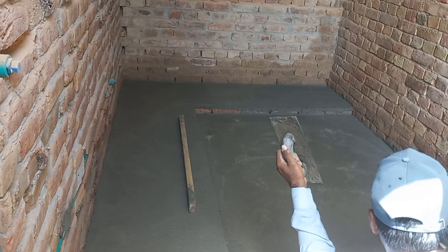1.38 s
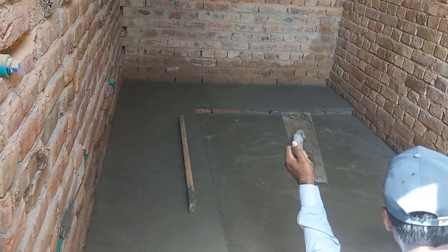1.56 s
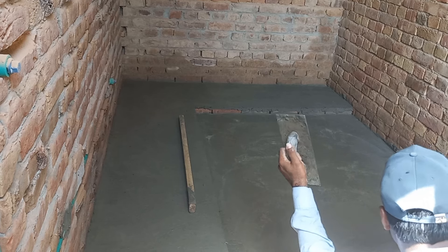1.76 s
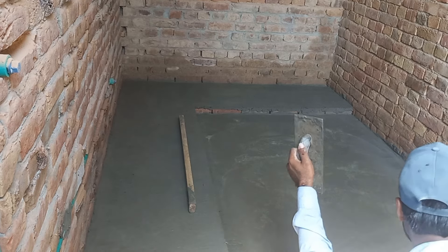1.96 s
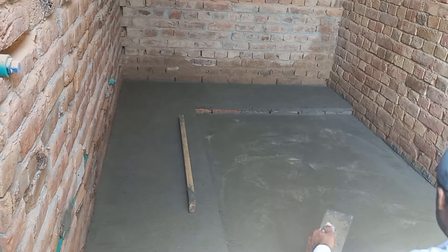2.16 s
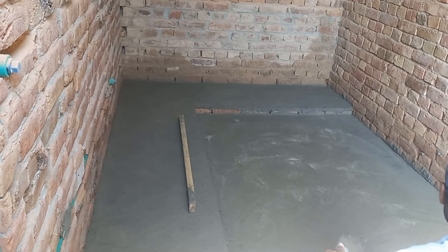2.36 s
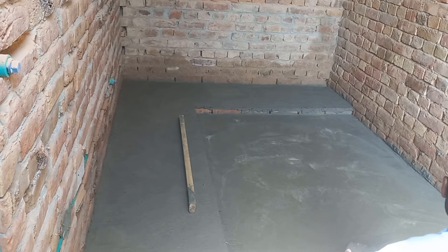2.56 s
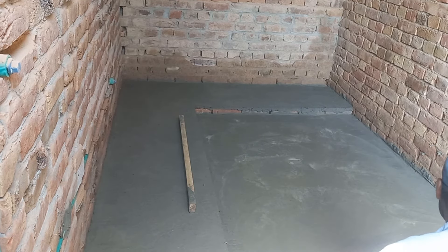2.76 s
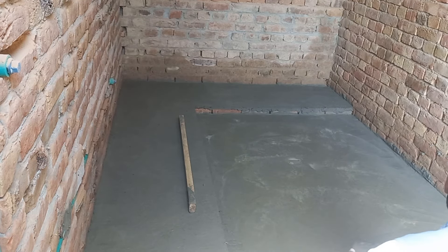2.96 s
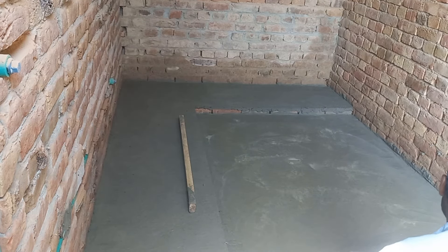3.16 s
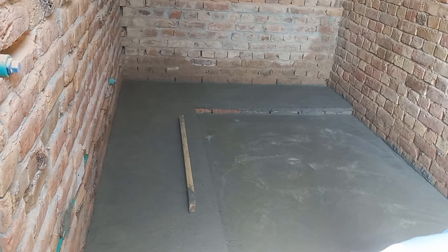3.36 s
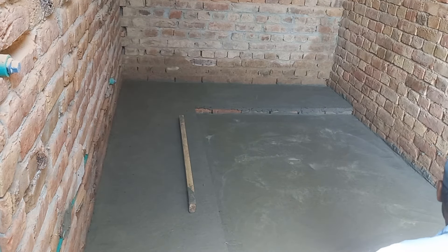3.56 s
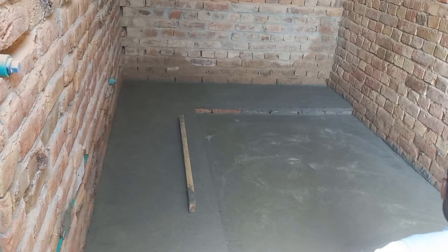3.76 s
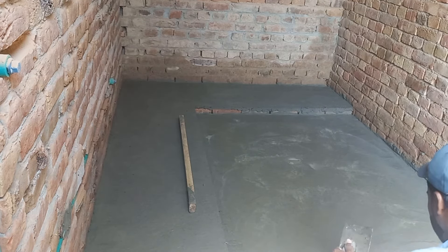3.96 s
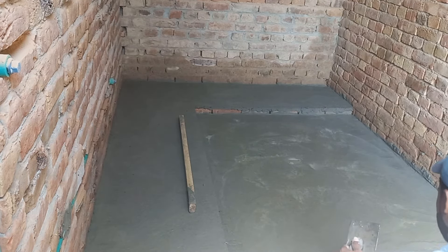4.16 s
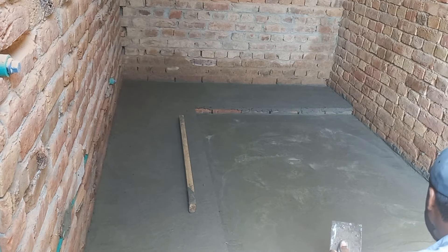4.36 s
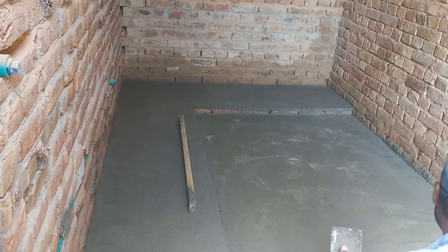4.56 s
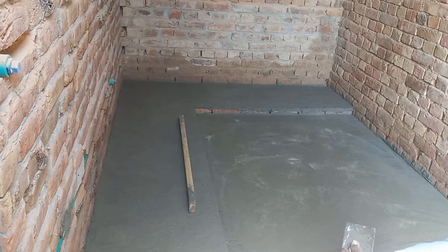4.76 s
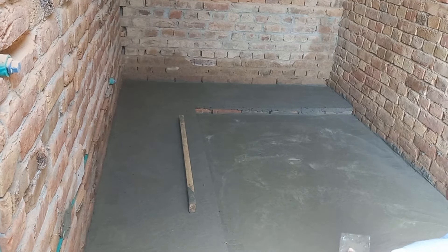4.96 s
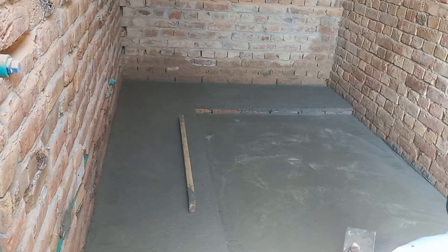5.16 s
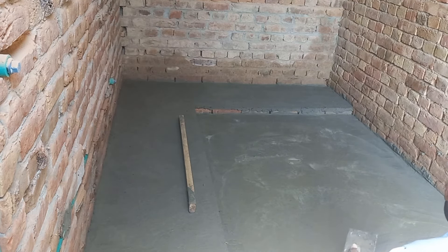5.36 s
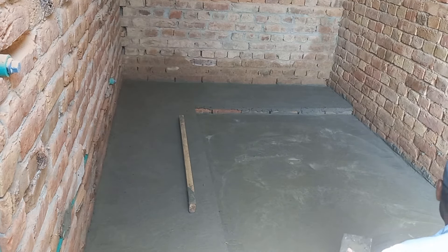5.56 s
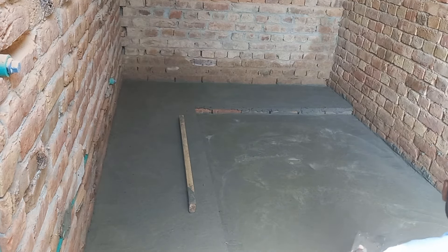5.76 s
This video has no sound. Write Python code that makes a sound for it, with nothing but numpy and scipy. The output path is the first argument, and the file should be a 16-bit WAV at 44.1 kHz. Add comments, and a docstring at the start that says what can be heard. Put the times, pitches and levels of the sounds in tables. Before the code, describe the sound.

Rapid, hissing trowel scrapes on wet cement in a small room, with soft thuds and a single loud wooden knock.

```python
"""A steel trowel smooths wet cement in a bare brick room, heard in fast motion: short slices of the work are
faded into each other. Sand hisses under the blade, and the steel sings faintly and pings on stones. The slab
drones as it is scraped, now louder, now quieter, and thuds stir the low notes of the room. One wooden knock
rings out. Two spaced microphones hear it all."""
import sys
import numpy as np
from scipy import signal
from scipy.fft import irfft
from scipy.io import wavfile
from scipy.ndimage import uniform_filter1d

SR = 44100
rng = np.random.default_rng(int(sys.argv[2]) if len(sys.argv) > 2 else 0)


def persist_wave(psi):
    """Save psi, clipped to +-1, as 16-bit WAV."""
    counts = np.round(np.clip(psi, -1, 1) * 32767).astype(np.int16)
    wavfile.write(sys.argv[1], SR, np.atleast_2d(counts).T)


N = 256662
SLICE_S, FIRST_CUT_S, FADE_S = .042007, .035, .01  # neighbouring slices overlap by one fade
FFT_SIZE = 4096
HZ = np.fft.rfftfreq(FFT_SIZE, 1 / SR)

# Moments when the trowel's sound sets in sharply: the lifted blade meets the cement, or the scraping hushes
# just before the knock. Each row: time in seconds, level change before that time in dB.
SHARP_ONSETS = [(0.797, -13.5), (1.857, -21), (3.399, -7), (3.514, -19)]
def trowel(start, length, hiss_db, bright_db, steel_db, steel_hz, drone_db, drone_hz, thud_db, swell_db):
    """One slice of a stroke: sand and steel swell or fade together, and the slab partly follows."""
    swell = gain_of(np.linspace(-.5, .5, length) * swell_db)
    swell /= np.sqrt(np.mean(swell ** 2))
    t = start - FADE_S / 2 + np.arange(length) / SR
    for land_s, quiet_db in SHARP_ONSETS:
        if t[0] < land_s < t[-1] - FADE_S / 2:
            swell[t < land_s] *= gain_of(quiet_db)
    scrape = sand(hiss_db, bright_db, length) + steel(steel_db, steel_hz, length)
    return scrape * swell + slab(drone_db, drone_hz, length) * swell ** 0.59 + thud(thud_db, length)


# The blade scrapes. Each row: start in seconds, hiss level in dB, swell across the slice in dB.
SCRAPES = [(0, -75, -3), (.035, -59, 5), (.077, -72.5, 8), (.119, -77.5, 1), (.161, -53.5, -11),
           (.203, -67.5, -1), (.245, -73, 0), (.287, -61.5, -12), (.329, -68.5, 2), (.37, -59, 4),
           (.412, -57.5, 2), (.455, -56.5, -1), (.497, -56, 1), (.538, -52.5, -3), (.581, -54.5, -1),
           (.623, -54, -2), (.665, -60.5, -5), (.707, -60.5, -2), (.749, -59, 1), (.793, -45, 1),
           (.833, -38, -3), (.874, -56.5, -28), (1.044, -47.5, 3), (1.085, -61.5, -15), (1.127, -52.5, -5),
           (1.211, -49, -3), (1.253, -53.5, -19), (1.337, -45.5, -12), (1.379, -51, -6), (1.42, -39, 10),
           (1.463, -42.5, -3), (1.504, -57, -10), (1.548, -55, 29), (1.589, -46.5, 3), (1.631, -52.5, 4),
           (1.715, -40, -4.5), (1.757, -52, -8), (1.798, -53.5, -17), (1.841, -52.5, 18), (1.883, -55, -9),
           (1.925, -61, 19), (1.967, -39.5, 0), (2.009, -49, -5), (2.05, -43.5, -6), (2.093, -40.5, -6),
           (2.135, -45, -15), (2.177, -46, -2), (2.219, -37.5, 4), (2.26, -58, 5), (2.302, -45, -4),
           (2.345, -45.5, -1), (2.387, -42, -4), (2.43, -41.5, 3), (2.47, -61, -17), (2.513, -37, 0),
           (2.555, -43, -7), (2.597, -44.5, -1), (2.639, -39, 9), (2.681, -34, -1), (2.724, -40, 2),
           (2.765, -40, -2), (2.807, -52, -6), (2.849, -51.5, -14), (2.891, -38.5, -6), (2.933, -41, -8),
           (2.975, -36.5, -1), (3.018, -48, 3), (3.059, -39, -1), (3.101, -45.5, -7), (3.143, -52, 3),
           (3.184, -46.5, -7), (3.227, -36, -7), (3.269, -38.5, 3), (3.311, -44, -8), (3.352, -63.5, -4),
           (3.395, -28.5, -4), (3.436, -49, -12), (3.479, -48, 14), (3.521, -39.5, 3), (3.563, -47.5, -13),
           (3.605, -43, -12), (3.647, -40.5, 11), (3.689, -39.5, -6), (3.731, -40.5, -1), (3.772, -48.5, 8),
           (3.814, -40, 0), (3.857, -53, -6), (3.899, -53, -18), (3.941, -41.5, 6), (3.982, -49.5, 1),
           (4.025, -44, -5), (4.109, -85, 0), (4.152, -56, 4), (4.192, -43.5, -1), (4.235, -54, 13),
           (4.277, -52.5, 0), (4.319, -58, 28), (4.361, -60, -5), (4.403, -49.5, 20), (4.445, -41, -5),
           (4.486, -52.5, 1), (4.529, -44, -4), (4.571, -70, -4), (4.613, -44.5, 0), (4.655, -47.5, -9),
           (4.697, -57, -1), (4.738, -44.5, 1), (4.781, -39.5, 3), (4.823, -53, 7), (4.865, -46, -7),
           (4.907, -51, -14), (4.949, -49, 5), (4.991, -49.5, 11), (5.033, -45.5, 3), (5.075, -53, -3),
           (5.117, -50, 1), (5.158, -50, -7), (5.202, -45, 2), (5.243, -43, -4), (5.285, -41, -12),
           (5.326, -50, 2), (5.368, -40, -15), (5.411, -46, 3), (5.453, -43.5, -12), (5.495, -41, -10),
           (5.537, -50, 6), (5.579, -54, -7), (5.62, -47, -1), (5.663, -54, 19), (5.705, -56.5, 2),
           (5.747, -58, -18), (5.79, -46, 4)]
def scrapes(count):
    """Hiss level and swell of every slice; a lifted blade leaves only a faint, even hiss."""
    hiss_db, swell_db = np.full(count, -79.0), np.zeros(count)
    for start, *row in SCRAPES:
        i = slice_at(start)
        hiss_db[i], swell_db[i] = row
    return hiss_db, swell_db


# The colour of the hiss. Each row: frequency in Hz, level in dB.
SAND_COLOUR = [(1470, -23), (2500, -3), (3600, 0), (3890, -2.5), (4550, 0), (7130, -8), (11800, -7.5),
               (14400, -11), (16000, -19.5)]
def sand(db, bright_db, length):
    """Sand grinds under the steel; bright_db tips the hiss towards the treble, in dB per octave."""
    tilt = gain_of(bright_db * np.log2((HZ + 1) / 7000))
    return noise(band(SAND_COLOUR) * tilt, db, length, rough_db=0.9, lump_samples=30)


# The colour of the singing blade. Each row: frequency in Hz, level in dB.
STEEL_COLOUR = [(700, -2), (1100, 3), (1600, 2), (2300, -0.5), (3100, -7), (4200, -7)]
def steel(db, hz, length):
    """The blade sings: a band of noise with one ringing pitch standing out."""
    ring = 1 + gain_of(-0.5) * resonance(hz, 190)
    return noise(band(STEEL_COLOUR) * ring, db, length, rough_db=0.48, lump_samples=80)


# Slices whose colour differs from the rest, among them the slices under the knock. Each row: start in seconds,
# hiss brightness in dB per # octave, steel level in dB, steel pitch in Hz.
COLOURED_SLICES = [(.035, -1.5, -61, 2530), (.161, 1, -54, 1650), (.538, -1.5, -53, 1360), (.793, 2, -31, 1420),
                   (.833, -1.5, -31.5, 1450), (.874, -2, -53.5, 1420), (1.044, 5.5, -51.5, 1230),
                   (1.253, 4.5, -57.5, 2000), (1.42, 0.5, -46, 1210), (1.463, 5, -48, 1310),
                   (1.631, 5, -58, 2740), (1.841, 4, -46.5, 2030), (1.925, -1, -62, 1830),
                   (2.26, 2.5, -73, 1390), (2.387, 6.5, -47.5, 1250), (2.43, 4, -54.5, 2850),
                   (2.47, -3, -63, 1850), (2.513, 2.5, -43, 3160), (2.555, 0, -54, 2660),
                   (2.891, 3, -52.5, 1800), (3.018, -2.5, -51.5, 1250), (3.143, 0, -50.5, 1250),
                   (3.227, -0.5, -43, 2270), (3.395, -1, -39.5, 2580), (3.436, -1, -60, 2920),
                   (3.479, -3, -53, 1480), (3.521, 1.5, -43, 2630), (3.563, -1, -54.5, 1260),
                   (3.647, 4, -56, 2170), (4.152, 1.5, -70, 2090), (4.403, 4, -76, 1250), (4.697, 1, -74, 1380),
                   (4.781, -1.5, -46.5, 2280), (4.949, 4.5, -54.5, 1360), (5.158, -4, -47, 1280),
                   (5.285, 1.5, -58, 2590), (5.663, 1.5, -73, 1260), (5.747, -1, -70, 1360),
                   (5.79, 3, -63, 2800)]
def blade_colours(rubbed_db, drone_db, pitch_chance, bright_chance):
    """The steel sings high when rubbed, lower when the slab shakes it; some slices set their own colour."""
    shaken_db = drone_db - 10
    steel_db = add_levels(rubbed_db, shaken_db)
    steel_hz = np.where(rubbed_db > shaken_db, 2650, 1340) * 2 ** (0.11 * pitch_chance)
    bright_db = 2.33 + 0.4 * bright_chance
    for start, *row in COLOURED_SLICES:
        i = slice_at(start)
        bright_db[i], steel_db[i], steel_hz[i] = row
    return bright_db, steel_db, steel_hz


# The blade hits stones. Each row: start in seconds, pitch in Hz, level in dB, rise in seconds,
# seconds to fade by 60 dB.
STONE_PINGS = [(1.564, 1500, -55, .002, 0.098), (1.667, 1940, -44, .001, 0.02),
               (1.858, 2080, -37, 0.00084, 0.024), (1.866, 2170, -34, 0.00085, 0.022),
               (3.515, 1390, -32.5, 0.00088, 0.027), (4.462, 2470, -38, .006, 0.067),
               (5.63, 2364, -48.5, 0.0037, 0.1)]
def pings(mix):
    """Each stone makes the steel ring briefly."""
    for start, hz, db, rise_s, ring_s in STONE_PINGS:
        t = np.arange(round(ring_s * SR)) / SR
        envelope = np.clip(t / rise_s, 0, 1) * gain_of(-60 * np.maximum(t - rise_s, 0) / ring_s)
        place(mix, start, tone(hz, db - 0.5, len(t), waver_db=2.2) * envelope)


# The steady work. Each row: time in seconds, drone under a medium scrape in dB, thud compared with the drone in
# dB, rubbed steel compared with the hiss in dB.
STEADY_WORK = [(0, -50, -4.5, -19), (.35, -46.5, -11, -4), (.64, -43, -10.5, -3), (.7, -49, -13, 1.5),
               (1, -51.5, -10, -3), (2, -51.5, -8, -7), (3, -50.5, -8, -9), (3.7, -53, -6, -11.5),
               (4.4, -54, -6.5, -8.5), (5, -52, -4.5, -8.5), (5.8, -56.5, 0, -10.5)]
def rubbing_levels(starts, hiss_db):
    """A louder scrape also drives the steel, the drone and the thud harder."""
    times, *columns = np.transpose(STEADY_WORK)
    drone_db, thud_offset_db, steel_offset_db = (np.interp(starts, times, column) for column in columns)
    medium_hiss_db = -46.5
    drone_db += 0.54 * (hiss_db - medium_hiss_db)
    return hiss_db + steel_offset_db, drone_db, drone_db + thud_offset_db


# The colour of the slab's drone. Each row: frequency in Hz, level in dB.
SLAB_COLOUR = [(130, -26), (220, -4), (420, -4), (570, -1.5), (800, -5.5), (1200, -11.5), (2200, -36)]
def slab(db, hz, length):
    """The slab drones: low noise plus one wavering note."""
    drone = noise(band(SLAB_COLOUR), db, length, rough_db=0.83, lump_samples=200)
    return drone + tone(hz, db - 6, length, waver_db=5.6)


# Slices where the slab's drone and thud take levels of their own, louder or quieter than usual. Each row: start
# in seconds, drone in dB, drone pitch in Hz, thud in dB.
SLAB_OWN_LEVELS = [(.161, -48, 247, -48), (.287, -50, 235, -53), (.497, -48, 320, -54.5), (.793, -33, 545, -63),
                   (.833, -32, 537, -39), (.874, -50.5, 310, -60), (1.085, -49, 592, -61), (1.42, -52, 776, -73),
                   (1.463, -44, 638, -59), (1.589, -41.5, 629, -56), (1.631, -52, 300, -56),
                   (1.674, -68, 476, -59), (1.715, -44.5, 507, -55), (1.757, -46, 340, -49.5),
                   (1.883, -50, 237, -58), (1.967, -45, 317, -60), (2.009, -47.5, 538, -55),
                   (2.219, -43, 646, -56), (2.302, -45, 634, -58), (2.345, -46.5, 544, -58),
                   (2.387, -37, 494, -48), (2.43, -52.5, 667, -48.5), (2.513, -37.5, 551, -60),
                   (2.555, -42.5, 636, -44.5), (2.597, -34, 282, -38.5), (2.639, -44, 592, -44),
                   (2.681, -38.5, 659, -36), (2.724, -47, 251, -48.5), (2.765, -54, 226, -45.5),
                   (2.849, -38.5, 483, -40.5), (2.975, -41, 573, -57), (3.018, -45, 589, -45.5),
                   (3.143, -44, 482, -48.5), (3.184, -44.5, 719, -54), (3.269, -39, 524, -57),
                   (3.311, -47.5, 673, -51), (3.352, -48, 584, -46.5), (3.395, -48, 469, -49),
                   (3.563, -42.5, 287, -45.5), (3.731, -50.5, 510, -50.5), (3.772, -46.5, 740, -46),
                   (3.814, -42.5, 671, -46), (3.857, -51.5, 303, -48.5), (3.982, -47, 784, -55),
                   (4.109, -67.5, 563, -61.5), (4.192, -49.5, 360, -54), (4.277, -51, 344, -55),
                   (4.361, -61, 512, -58), (4.445, -53, 359, -57), (4.571, -63, 720, -67),
                   (4.738, -66, 1020, -62), (4.781, -47.5, 937, -54), (4.949, -47, 388, -54),
                   (4.991, -50, 341, -60), (5.117, -52.5, 658, -48.5), (5.158, -38, 833, -34.5),
                   (5.202, -48, 338, -43), (5.243, -54, 592, -49), (5.326, -40, 466, -49),
                   (5.495, -44, 320, -47), (5.579, -57.5, 228, -52), (5.663, -50.5, 349, -54),
                   (5.705, -45.5, 639, -46.5), (5.747, -52.5, 525, -50)]
def set_slab_levels(drone_db, drone_hz, thud_db):
    """Each listed slice gets a drone and a thud of its own."""
    for start, *row in SLAB_OWN_LEVELS:
        i = slice_at(start)
        drone_db[i], drone_hz[i], thud_db[i] = row


# The notes the struck wood rings at. Each row: pitch in Hz, level in dB.
WOOD_NOTES = [(250, -5), (290, -4), (428, -5.5), (528, -2), (600, -31.5), (800, -15), (870, -10),
              (1300, -7), (1465, -1.5), (1575, -11), (1695, -8.5), (2090, -14), (2430, -17)]
# The two parts of the knock. Each row: start in seconds, length in seconds, rise in seconds,
# level in dB, change of the notes in dB per octave away from 528 Hz.
KNOCK_PARTS = [(0.8, 0.025, 0.0031, -19, -12.5), (0.828, 0.036, 0.0052, -20, -2.5)]
def knock(mix):
    """Struck wood, kept ringing by its rattle and the bare walls, over a rough clatter."""
    to_the_left = gain_of([[1.2], [-1.2]])
    for start, length_s, rise_s, db, slope_db in KNOCK_PARTS:
        length = round((length_s + FADE_S) * SR)
        notes = [(hz, note_db + slope_db * abs(np.log2(hz / 528))) for hz, note_db in WOOD_NOTES]
        ring = sum(tone(hz, note_db, length, waver_db=8.6) for hz, note_db in notes)
        colour = sum(gain_of(note_db) * resonance(hz, 190) ** 2 for hz, note_db in notes)
        clatter = noise(colour, -5, length, rough_db=2.5, lump_samples=100)
        place(mix, start, faded(to_the_left * at_level(ring + clatter, db), rise_s))


# The colour of the thud. Each row: frequency in Hz, level in dB.
THUD_COLOUR = [(20, -31.5), (45, -3), (70, -4.5), (110, 3), (170, 1), (260, -15.5)]
def thud(db, length):
    """Deep noise, boosted at the two lowest notes of the small room."""
    room = 1 + gain_of(10.5) * (resonance(102, 25) + resonance(185, 30))
    return noise(band(THUD_COLOUR) * room, db, length, rough_db=0.32, lump_samples=400)


# How alike the two microphones sound. Each row: frequency in Hz, likeness from 0 to 1.
MIC_LIKENESS = [(40, 1), (250, 0.86), (600, 0.8), (1200, 0.33), (4000, 0.17), (15000, 0.45)]
# Which side is louder. Each row: frequency in Hz, left compared with right in dB.
MIC_BALANCE = [(60, -3), (110, 2), (200, 0), (380, 1.5), (700, -2), (1290, 0), (2380, 1.5), (4400, 0.5),
               (8120, 6.5), (15000, 2)]
# Which side is earlier. Each row: frequency in Hz, lead of the left side in radians.
MIC_LEAD = [(0, -2), (690, 0.5), (1120, -3), (1720, -5), (2070, -3.5), (2500, 0), (3620, 5), (4570, -0.3),
            (5080, -2.5), (6120, 0.5), (6370, -1.5), (6800, 2), (16000, 0.5)]
def noise(colour, db, length, rough_db, lump_samples):
    """Rubbing noise at the two microphones; both sides share the same lumps in loudness."""
    a, b, c, d, echoes, patches = rng.standard_normal((6, len(HZ)))
    colour = colour * wobble(patches, 150, depth_db=1.5)  # broad patches of colour, new each time
    colour = colour * wobble(echoes, 12, depth_db=2.9)  # echoes off the bricks ripple the spectrum
    likeness = curve(MIC_LIKENESS)
    left, unrelated = a + 1j * b, c + 1j * d
    right = likeness * left * np.exp(-1j * curve(MIC_LEAD)) + np.sqrt(1 - likeness ** 2) * unrelated
    lean = gain_of(curve(MIC_BALANCE) / 2)
    sound = irfft(np.array([left * lean, right / lean]) * colour, FFT_SIZE)[:, :length]
    lumps = wobble(rng.standard_normal(FFT_SIZE), lump_samples, rough_db, mode="wrap")
    return at_level(sound * lumps[:length], db)


def tone(hz, db, length, waver_db):
    """One ringing note whose level wavers; the right microphone hears the wave shifted."""
    t = np.arange(length) / SR
    phase, waver_phase, rate, side = rng.random(4)
    unlikeness = 1 - np.interp(hz, HZ, curve(MIC_LIKENESS))
    lag = np.interp(hz, HZ, curve(MIC_LEAD)) + 2 * np.pi * unlikeness * (side - .5)
    level = gain_of(db + waver_db * np.sin(2 * np.pi * ((15 + 30 * rate) * t + waver_phase)))
    level /= max(abs(np.cos(lag / 2)), .5)  # makes up for the two sides partly cancelling
    return np.sqrt(2) * level * np.sin(2 * np.pi * (hz * t + phase) - np.array([[0], [lag]]))


def gain_of(db):
    """Turns decibels into a number to multiply by."""
    return 10 ** (np.asarray(db) / 20)


def add_levels(a_db, b_db):
    """The level in dB of two unrelated sounds together."""
    return 10 * np.log10(gain_of(2 * a_db) + gain_of(2 * b_db))


def at_level(sound, db):
    """Scales a sound so that the average of its two sides has this level."""
    return gain_of(db) * sound / np.sqrt(np.mean(sound.mean(axis=0) ** 2))


def wobble(draws, width, depth_db, mode="reflect"):
    """Smooths random numbers into a gain that wanders up and down."""
    smooth = uniform_filter1d(uniform_filter1d(draws, width, mode=mode), width, mode=mode)
    return gain_of(depth_db * smooth / smooth.std())


def curve(points):
    """Joins the rows of a table into a value for every frequency."""
    hz, value = np.transpose(points)
    return np.interp(np.log(HZ + 1), np.log(hz + 1), value)


def band(points):
    """Turns a colour table into gains, silent beyond its first and last row."""
    return gain_of(curve(points)) * (HZ > points[0][0]) * (HZ < points[-1][0])


def resonance(hz, width_hz):
    """A hump of gain around one pitch."""
    return 1 / np.sqrt(1 + ((HZ - hz) / (width_hz / 2)) ** 2)


def faded(sound, rise_s):
    """Fades a sound in and out along straight lines."""
    t = np.arange(sound.shape[1]) / SR
    return sound * np.clip(np.minimum(t / rise_s, t[::-1] / FADE_S), 0, 1)


def place(mix, start, sound):
    """Adds a sound to the mix, which begins one fade before time zero."""
    first = round((start + FADE_S) * SR)
    mix[:, first:first + sound.shape[1]] += sound


def slice_at(start):
    """The number of the slice that starts nearest this time."""
    return round((start - FIRST_CUT_S) / SLICE_S) + 1


def plan_slices():
    """One row for each slice: its start, then the trowel's levels and pitches."""
    count = slice_at(N / SR) + 1
    starts = np.maximum(FIRST_CUT_S + SLICE_S * (np.arange(count) - 1), 0)
    drone_chance, steel_chance, bright_chance = rng.standard_normal((count, 3)).T
    hiss_db, swell_db = scrapes(count)
    rubbed_db, drone_db, thud_db = rubbing_levels(starts, hiss_db)
    drone_hz = 566 * 2 ** (0.259 * drone_chance)
    set_slab_levels(drone_db, drone_hz, thud_db)
    thud_db = add_levels(thud_db, -72.5)  # the room's rumble never stops
    bright_db, steel_db, steel_hz = blade_colours(rubbed_db, drone_db, steel_chance, bright_chance)
    columns = [starts, hiss_db, bright_db, steel_db, steel_hz, drone_db, drone_hz, thud_db, swell_db]
    return np.transpose(columns)[starts < N / SR]


def scene():
    """The trowel's slices end to end, with the knock and the pings on top."""
    mix = np.zeros((2, N + SR))
    late_s = 0.00092  # each fade is centred just after its slice starts
    rows = plan_slices()
    ends = [*rows[1:, 0], N / SR + FADE_S]
    for (start, *settings), end in zip(rows, ends):
        length = round((end - start + FADE_S) * SR)
        stroke = trowel(start + late_s, length, *settings)
        place(mix, start + late_s - FADE_S / 2, faded(stroke, FADE_S))
    knock(mix)
    pings(mix)
    return mix[:, round(FADE_S * SR):][:, :N]


def record(dry):
    """The small microphones lose the deepest bass, and the highest treble is cut off."""
    bass_hz, treble_hz = 40, 16000
    thinned = signal.lfilter(*signal.butter(2, bass_hz, "high", fs=SR), dry)
    treble_cut = signal.firwin(511, treble_hz, window=("kaiser", 9), fs=SR)
    return signal.oaconvolve(thinned, treble_cut[None], "same")


dry = scene()
out = record(dry)
persist_wave(out)
```